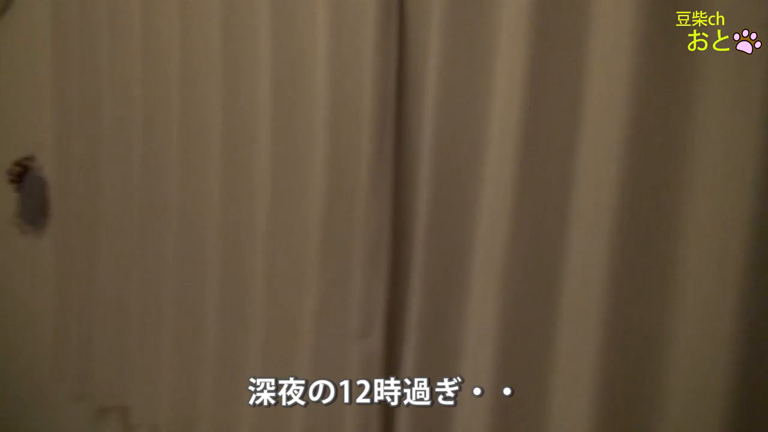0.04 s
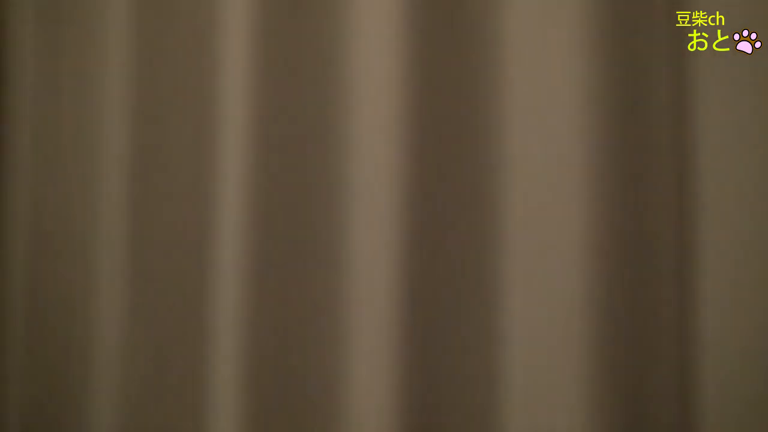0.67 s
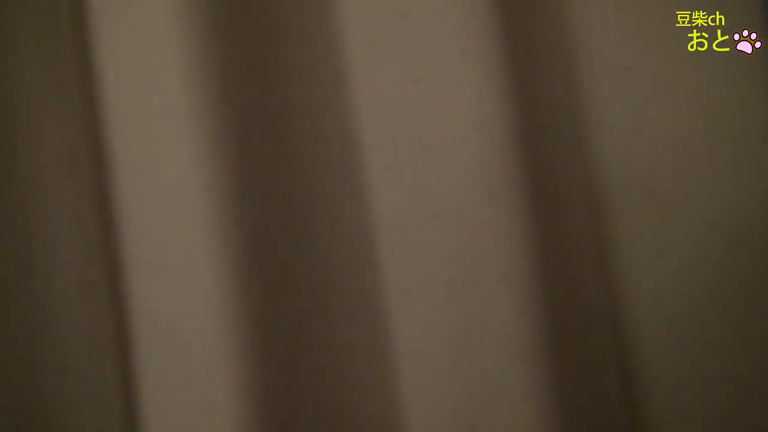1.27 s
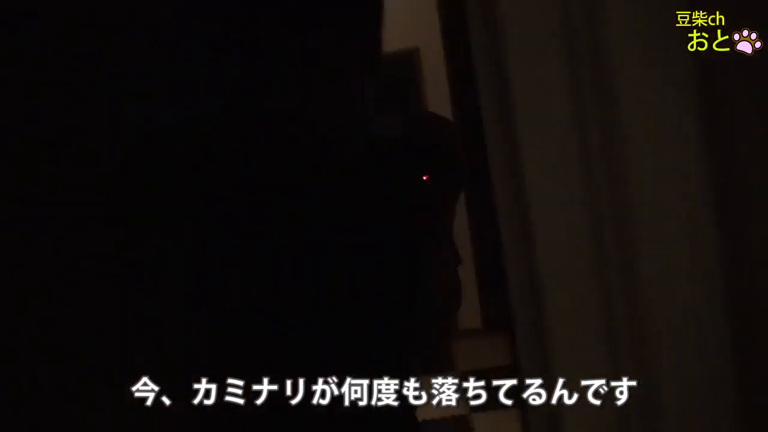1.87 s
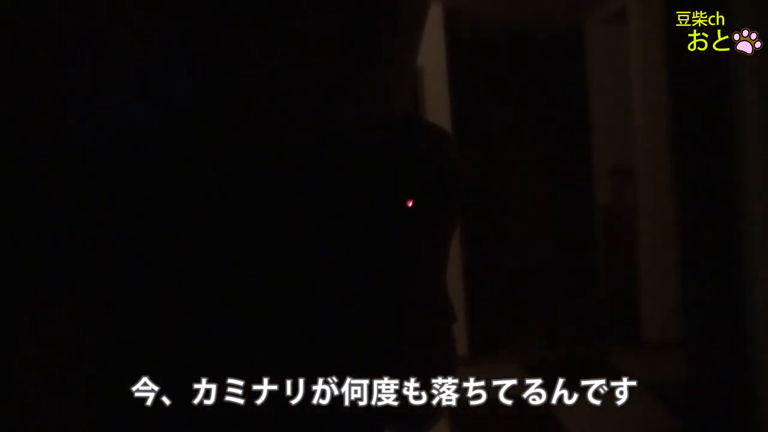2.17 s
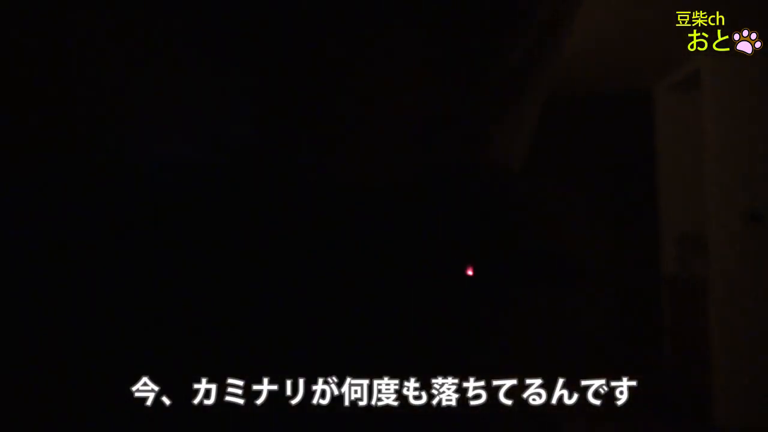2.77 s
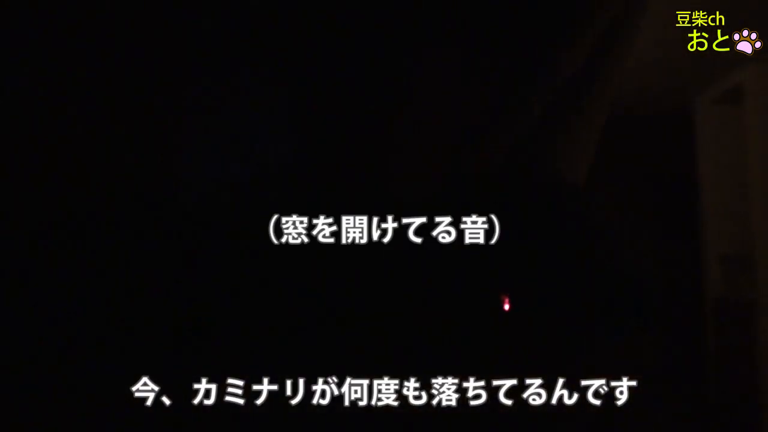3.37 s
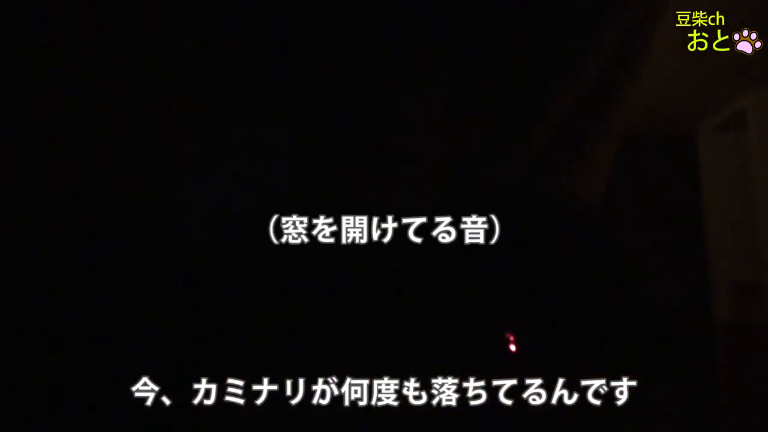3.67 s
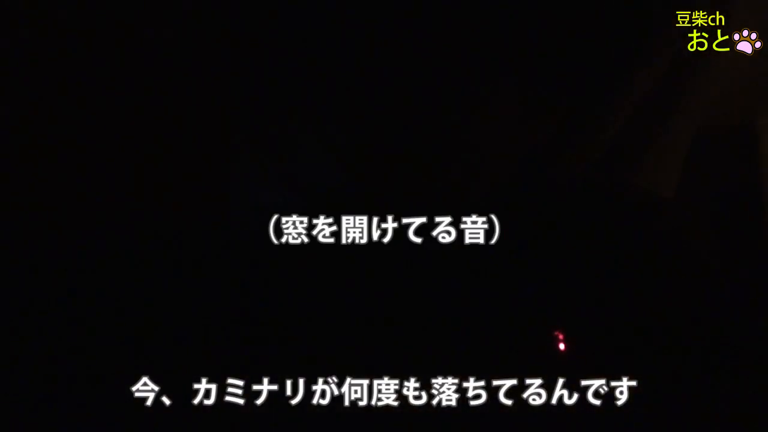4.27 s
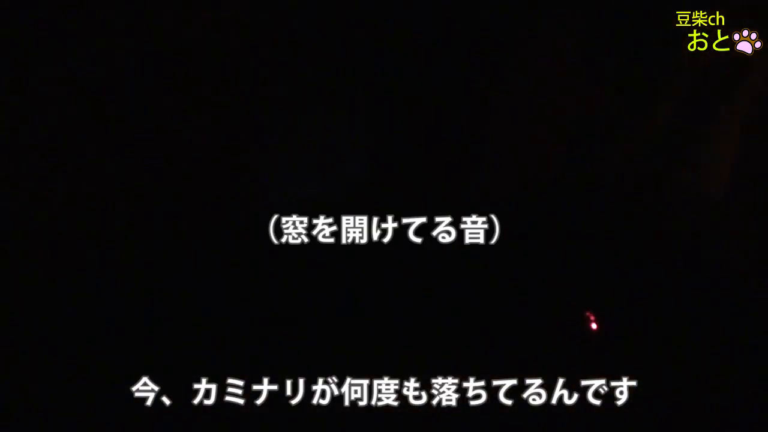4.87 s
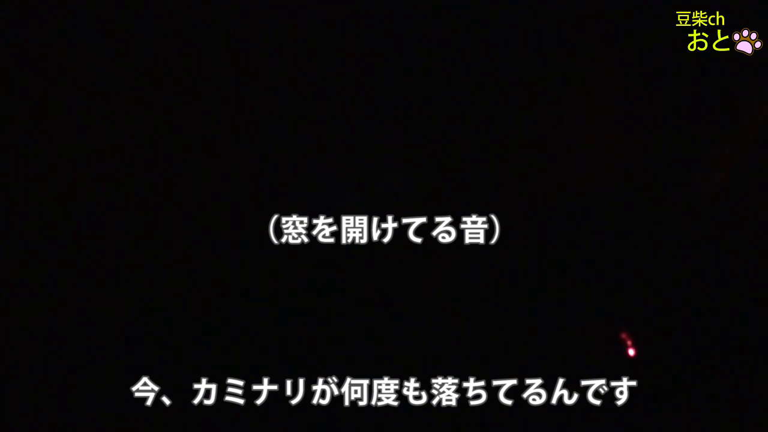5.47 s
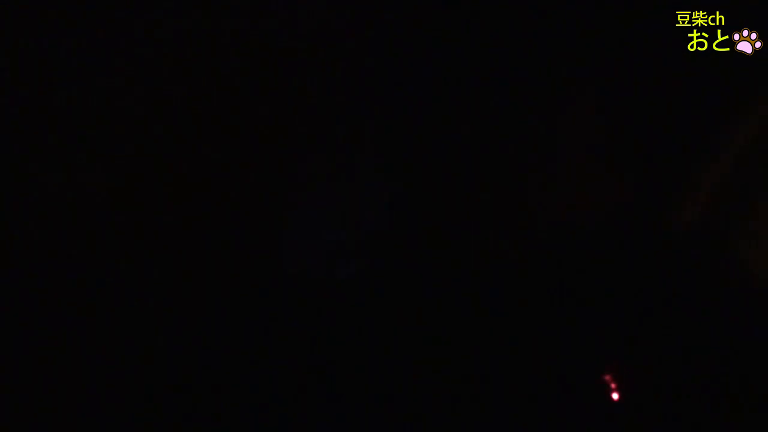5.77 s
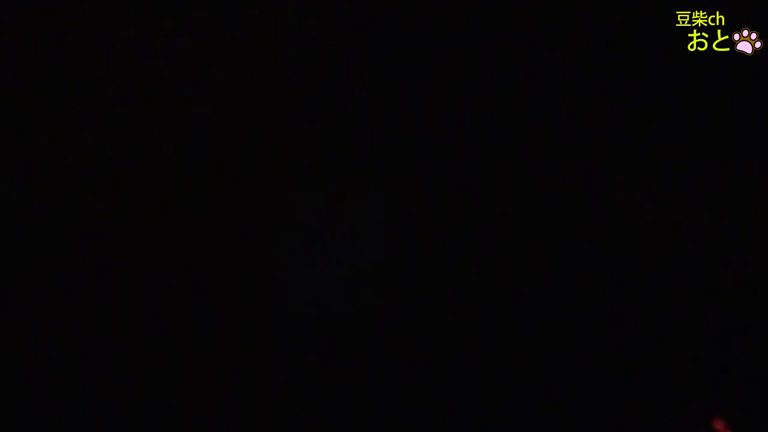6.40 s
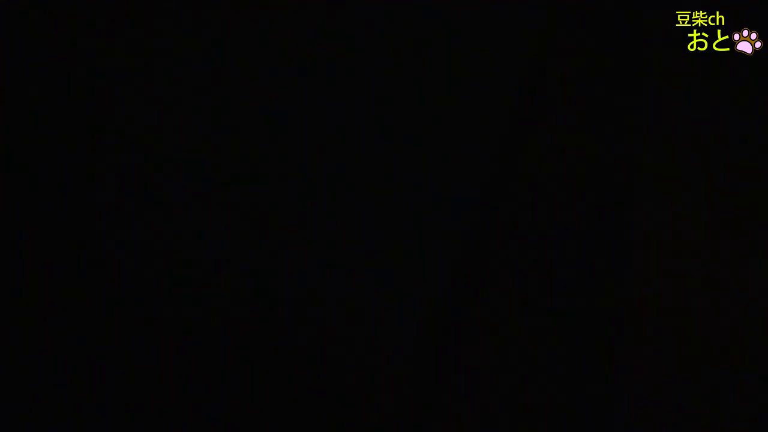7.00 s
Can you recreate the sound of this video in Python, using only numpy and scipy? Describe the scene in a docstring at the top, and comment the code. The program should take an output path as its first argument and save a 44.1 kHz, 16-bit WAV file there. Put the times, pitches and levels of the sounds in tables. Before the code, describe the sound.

Curtains rustle softly, then a sliding metal window is unlatched and opened with sharp clicks, rattles and a short scrape.

```python
"""The latch and sash of a sliding metal window click and rattle as someone opens it at night in a small room.
Each impact excites the modes of the frame and the hollow sash, and jolts make the pane thump. Stick-slip
friction squeaks on the track; the sash scrapes free, its seal pops, and it rolls a little way and settles.
Before that, cloth curtains rustle as the person pushes through. Soft shuffling and steady room noise lie
underneath, and a faint hiss of the night enters through the gap."""
import sys
import numpy as np
from scipy import signal
from scipy.fft import rfft, irfft, next_fast_len
from scipy.io import wavfile
from scipy.ndimage import uniform_filter1d, map_coordinates

SR = 44100
rng = np.random.default_rng(int(sys.argv[2]) if len(sys.argv) > 2 else 0)


def master(y):
    """Save y as 16-bit WAV."""
    cut = np.clip(np.atleast_2d(y).T, -1, 1)
    pcm = np.round(cut * 32767)  # scale
    wavfile.write(sys.argv[1], SR, pcm.astype(np.int16))


N = 314874

# Latch and sash snapping home. Each row: start in seconds, level in dB, knock, bite and fizz in dB relative
# to it, leading ring in Hz, t60 in seconds, lead of the first touch in seconds, touch level in dB.
SNAPS = [(2.753, -22, -11, 0, -11.5, 2380, 0.043, .004, -28.5),
         (3.001, -37, -12.5, -2.5, -13, 1530, 0.046, 0.009, -38.5),
         (3.4553, -22.5, -15.5, -3.5, -15, 1830, .033, 0.0053, -42.5),
         (3.659, -27.5, -13.5, -3, -32, 6030, 0.041, 0.0097, -46),
         (4.056, -26, -10, 6, -13.5, 2950, 0.028, 0.0046, -41),
         (4.2497, -33, -18, -7, -21, 2210, 0.041, 0.005, -46),
         (5.213, -22.5, -26, -1.5, -9.5, 1800, 0.038, 0.0082, -48),
         (5.704, -36.5, -17, -1, -22, 1910, .036, .01, -44.5),
         (5.748, -31, -10, -7.5, -21.5, 1720, 0.038, 0.0076, -43)]
# Taps of loose metal. Each row: start in seconds, level in dB, hardness in dB.
TAPS = [(.008, -49.5, -4.5), (1.981, -42.5, -23), (2.057, -39, -7), (2.357, -50.5, 5), (2.376, -44.5, 0),
        (2.62, -44, 6.5), (2.643, -44, -6), (2.673, -43, -4), (3.13, -45, -4.5), (3.255, -45, -10),
        (3.343, -46.5, 1.5), (3.363, -50, -23), (3.376, -36.5, -9.5), (3.464, -30.5, -4.5),
        (3.489, -38.5, -2.5), (4.19, -51, 0), (4.307, -34, -4), (4.62, -47.5, -5), (4.707, -40.5, -19),
        (4.728, -46, 2.5), (4.96, -52, -4), (5.109, -45.5, -1.5), (5.2315, -34, 4.5), (5.2618, -45.5, 10.5),
        (5.642, -55.5, 2), (5.861, -44.5, -6), (5.9596, -26.5, -11), (6.143, -40.5, -4.5),
        (6.184, -41, -22), (6.21, -44.5, -15), (6.324, -38, -8), (6.353, -52.5, 6.5), (6.37, -53, 7.5),
        (6.39, -37.5, 3), (6.442, -42.5, 3), (6.484, -52, 2), (7.037, -41, -6)]
# Dull knocks of the sash in its frame. Each row: start in seconds, level in dB, leading ring in Hz.
KNOCKS = [(2.355, -48, 403), (3.08, -41, 330), (3.47, -35.5, 300), (4.298, -32.5, 640), (4.311, -35, 385),
          (4.392, -42.5, 536), (4.412, -39.5, 410), (4.445, -40, 510), (5.678, -46.5, 670),
          (6.246, -41, 280)]
# Resonances of the metal. Each row: frequency in Hz, bandwidth in Hz, gain in dB.
FRAME_MODES = [(386, 22, -12), (720, 42, -26), (1160, 190, -13), (1390, 116, -4.5), (1608, 84, -8.5),
               (1780, 105, -4.5), (1927, 140, -6), (2365, 170, -13.5), (2860, 900, -12), (3210, 160, -14.5),
               (3610, 460, -14.5), (4100, 75, -8.5), (4530, 520, -11), (5180, 120, -13), (6230, 120, -7),
               (6600, 180, -12.5), (7020, 150, -2), (7700, 190, -5), (7940, 130, -19), (11040, 660, -11),
               (12900, 300, -13)]
TRACK_MODES = [(6180, 10, -1), (6400, 7.7, 1), (6640, 9, -10)]
# Modes of the hollow sash and the glass. Each row: frequency in Hz, relative level in dB, t60 in seconds.
SASH_MODES = [(241.6, -15, 0.3), (330.4, -4, 0.3), (396.4, -0.5, 0.17), (502, -4.5, 0.25), (533, -23, 0.26),
              (714, -1, 0.095)]
PANE_MODES = [(20.8, -2.5, 0.47), (48.7, 3, 0.25), (58.6, -7, 0.29), (78.4, -8.5, 0.36), (96, -9, 0.41),
              (117, -6.5, 0.29), (163, -9.5, 0.21), (200.5, -3, 0.2), (249.3, -6, 0.26), (289, -12.5, 0.32),
              (396, -22, 0.16), (537, -19, 0.22)]
# Jolts of the pane. Each row: start in seconds, level in dB.
JOLTS = [(3.001, -52), (3.466, -42), (3.663, -34), (4.071, -40), (4.312, -43), (4.459, -48), (4.712, -53),
         (5.746, -39.5), (5.895, -39), (6.25, -43.5)]
# The rubber seal letting go. Each row: start in seconds, pitch in Hz, relative level in dB, t60 in seconds.
POPS = [(5.918, 940, -10, 0.016), (5.9233, 1340, -10, 0.012), (5.9617, 1360, -19, 0.013),
        (5.965, 1010, -22, 0.036), (5.972, 1100, -7, 0.0093), (5.9959, 1184, -3, 0.011)]
# Squeaks of the curtain runners and the track.
# Each row: start and length in seconds, first and last pitch in Hz, level in dB.
SQUEAKS = [(1.537, 0.022, 2155, 2310, -41.5), (3.651, 0.0072, 4900, 5830, -30),
           (3.658, 0.0079, 6080, 6150, -24.5), (3.6584, 0.0096, 6660, 6500, -25.5),
           (4.645, 0.0094, 1480, 1440, -42), (5.765, 0.015, 6160, 6160, -30.5),
           (5.878, 0.014, 5770, 5730, -24), (5.8902, 0.0083, 5100, 5230, -15.5)]
# Strokes of cloth. Each row: start and rise in seconds, rubbing level in dB, hiss in dB relative to it.
STROKES = [(0.026, 0.031, -48.5, -10), (.07, 0.043, -54.5, 0), (.437, 0.027, -55, 0.5),
           (.5, 0.058, -50, -6), (.62, 0.038, -54.5, 1), (1.07, 0.017, -65, 4), (1.19, 0.082, -52, 0),
           (1.533, 0.01, -43, -5), (1.79, 0.053, -57.5, -4), (1.895, 0.14, -50.5, -5.5),
           (2.054, 0.0072, -38.5, -4), (2.153, 0.0073, -49.5, 3), (2.348, 0.0041, -48.5, -5),
           (2.45, 0.058, -50.5, -2), (2.78, 0.047, -54, -6), (2.912, 0.079, -47.5, 0.5),
           (3.098, 0.059, -56.5, -0.5), (4.36, .017, -54.5, -3), (4.44, 0.01, -57, 6.5)]
# Spectra of the impacts, friction and background noises. Each row: frequency in Hz, relative level in dB.
CONTACT_SPECTRUM = [(130, -4.5), (330, -7.5), (650, 2), (2000, -1), (3100, 1.5), (5000, 2.5), (8000, -5),
                    (9500, -9), (12500, -20.5), (16000, -39)]
GRIND_SPECTRUM = [(40, -5), (160, 0.5), (400, 2.5), (1100, 0), (2000, 2.5), (3500, -4.5), (6000, -7.5),
                  (8500, -21), (16000, -39)]
ROLL_SPECTRUM = [(300, 5), (2000, 1), (5500, 2.5), (8200, 4.5), (10000, -1.5), (12500, -6), (16000, -36)]
LATCH_RUB_SPECTRUM = [(300, -10), (900, 0.5), (1600, 1), (3000, -11), (6500, -15), (12000, -36)]
CLOTH_RUB_SPECTRUM = [(200, -12), (600, -6), (1300, -5.5), (2200, 0), (3800, 1), (5500, -9), (9000, -22),
                      (16000, -35)]
CLOTH_HISS_SPECTRUM = [(2000, -42), (4200, -0.5), (5800, 2.5), (8000, -1.5), (9500, -4), (11500, -10),
                       (16000, -35)]
SHUFFLE_SPECTRUM = [(20, -9), (40, -3), (65, 0), (230, 0.5), (500, -6), (1700, -7), (3000, -12),
                    (7000, -16.5), (14000, -40.5)]
NIGHT_SPECTRUM = [(500, 3.5), (2000, 3.5), (6000, 0), (9000, -10), (16000, -31)]
AIR_SPECTRUM = [(12, -56), (20, -18), (156, -4), (189, -14.5), (243, -6.5), (487, -17.5), (608, -14),
                (896, -16), (1030, -13), (1120, -16.5), (1840, -16.5), (15200, -37)]
# Envelopes of the shuffling and the night outside. Each row: time in seconds, relative level in dB.
SHUFFLE_LEVELS = [(0, -59), (.35, -74), (.55, -59.5), (.9, -70), (1.7, -56), (2.0, -55), (2.9, -57.5),
                  (3.6, -50), (3.9, -60.5), (4.3, -49.5), (5.0, -59), (5.4, -61.5), (5.8, -55), (6.25, -53),
                  (6.5, -59.5), (7.1, -65)]
NIGHT_LEVELS = [(5.9, -85), (6.55, -68.5), (6.95, -61.5)]
# Reverberation of the room. Each row: frequency in Hz, t60 in seconds.
ROOM_DECAY = [(100, 0.41), (400, 0.51), (1500, 0.22), (6300, 0.22), (10000, 0.2), (16000, 0.32)]


def impacts(ring_db=8, scatter_db=3.2, lead_q=5, onset_s=0.00054, hum_db=-7):
    """Modal excitation: each contact drives frame and sash with a sharp blow and a brief chatter."""
    size = 8192
    out, t, hz = np.zeros(N), np.arange(size) / SR, np.fft.rfftfreq(size, 1 / SR)
    bands_hz = [(600, 2500), (200, 600), (2500, 8300), (8300, 16000)]  # middle, knock, bite, fizz
    filters = [signal.butter(3, band, "band", fs=SR, output="sos") for band in bands_hz]
    attack = t < .009  # each band's level is set over this span
    taper = np.minimum(1, 2 * (1 - t / t[-1])) ** 2
    modes, contact = frame_modes(hz), amp(along(CONTACT_SPECTRUM, hz))
    contacts = snaps() + [tap(*row) for row in TAPS] + [knock(*row) for row in KNOCKS] + rattles()
    for s, db, knock_db, bite_db, fizz_db, lead_hz, t60, room_db in contacts:
        envelope = (fade(t, t60) + amp(-1) * fade(t, 0.0057)) * (1 - np.exp(-t / onset_s))
        force = rng.standard_normal(size) * envelope
        # each point of contact drives the modes differently
        mode_gains = amp(ring_db + scatter_db * rng.standard_normal((len(modes), 1)))
        body = 1 + np.sum(mode_gains * modes, axis=0)
        struck_part = 1 + resonance(hz, lead_hz, lead_hz / lead_q)
        ring = irfft(rfft(force) * contact * body * struck_part) * taper
        hit = amp(db + knock_db + hum_db) * ringing(SASH_MODES, t)
        for sos, weight_db in zip(filters, (0, knock_db, bite_db, fizz_db)):
            band = signal.sosfilt(sos, ring)
            hit += amp(db + weight_db) * band / np.std(band[attack])
        add(out, s, hit)
        add(out, s, amp(room_db) * signal.fftconvolve(hit, room_tail()))
    return out


def snaps(touch_bite_db=6, touch_hz=5940, touch_room_db=-14.5):
    """Double impact: a light, bright touch precedes the full blow."""
    rows = []
    for s, db, knock_db, bite_db, fizz_db, hz, t60, early, touch_db in SNAPS:
        room_db = -13.5 + 12 * np.log2(t60 / .036)  # longer chatter fills the room more
        rows.append((s - early, touch_db, knock_db, touch_bite_db, fizz_db + 12, touch_hz, t60, touch_room_db))
        rows.append((s, db, knock_db, bite_db, fizz_db, hz, t60, room_db))
    return rows


def tap(s, db, hardness_db, knock_db=-9.5, t60=0.03, room_db=-15):
    """Contact stiffness: the harder a light impact, the brighter and higher it rings."""
    lead_hz = 6000 if hardness_db > 1 else 1660  # hard taps ring the catch, soft ones the frame
    fizz_db = -8.5 + 1.75 * hardness_db
    return s, db, knock_db, hardness_db, fizz_db, lead_hz, t60, room_db


def knock(s, db, lead_hz, knock_db=7.5, bite_db=-6.5, fizz_db=-21, t60=.042, room_db=-16):
    """Soft, heavy impact: the energy lies mostly in the lowest band."""
    return s, db - knock_db, knock_db, bite_db, fizz_db, lead_hz, t60, room_db


def rattles(count=8, span_s=(3.3, 6.35), db=-53, hardness_db=-6, spread_db=2):
    """Intermittent contact: loose metal taps at random while the sash is handled."""
    times = rng.uniform(*span_s, count)
    scatter = spread_db * rng.standard_normal((count, 2))
    return [tap(s, db + louder, hardness_db + harder) for s, (louder, harder) in zip(times, scatter)]


def frame_modes(hz):
    """Resonance: the frame responds as a set of damped oscillators, one row a mode."""
    centre, width, db = np.transpose(FRAME_MODES)[:, :, None]
    return amp(db) * resonance(hz, centre, width)


def pane(even_jolt_db=-41.5):
    """Free vibration: the heavy glass booms after each jolt, deeper after the hard ones."""
    out, t = np.zeros(N), np.arange(SR // 2) / SR
    for s, db in JOLTS:
        db_per_octave = 0.42 * (even_jolt_db - db)
        modes = [(hz, level + db_per_octave * np.log2(max(hz / 60, 1)), t60)
                 for hz, level, t60 in PANE_MODES]
        add(out, s, amp(db) * ringing(modes, t))
    return out


def slide(break_s=5.879, roll_s=5.985, crossover_hz=5000):
    """Sliding, then rolling friction: the sash grinds loose and rolls with a gritty crackle."""
    scrape_level = amp(-27) * swell(break_s, attack=0.014, length=0.08, t60=0.066)
    grit_level = amp(-35.5) * swell(break_s, attack=0.014, length=0.052, t60=0.066)
    rumble_level = amp(-43.5) * swell(roll_s, attack=0.0081, length=0.0081, t60=0.9)
    roll_level = amp(-47.5) * swell(roll_s, attack=0.0081, length=0.18, t60=0.018)
    grind = coloured(grains(3500, smooth=0.8), GRIND_SPECTRUM) * amp(0.5 * wobble(140))
    rollers = coloured(grains(1100, smooth=0.6), ROLL_SPECTRUM)
    through_frame = unit(filtered(rollers, lambda hz: 1 + frame_modes(hz).sum(axis=0)))
    # the rollers catch unevenly, in the low crunch and the fine grit apart
    crunch = filtered(through_frame, lambda hz: 1 / (1 + (hz / crossover_hz) ** 2))
    grit = through_frame - crunch
    roll = crunch * amp(2.1 * wobble(99)) + grit * amp(2.7 * wobble(170))
    return (scrape_level + rumble_level) * grind + (grit_level + roll_level) * roll


def seal_pops(gain_db=-2, onset_s=0.0006):
    """Release of adhesion: the seal comes unstuck in hollow, heavily damped tones."""
    out, t = np.zeros(N), np.arange(SR // 10) / SR
    for s, hz, db, t60 in POPS:
        tone = np.sin(2 * np.pi * hz * t) + amp(-40) * rng.standard_normal(len(t))
        add(out, s, amp(db + gain_db) * tone * fade(t, t60) * (1 - np.exp(-t / onset_s)))
    return out


def squeaks(waver_depth=.016):
    """Stick-slip oscillation: metal sings for milliseconds at a shrill, unsteady pitch."""
    out = np.zeros(N)
    for s, length, start_hz, end_hz, db in SQUEAKS:
        n = int(length * SR)
        waver = unit(uniform_filter1d(rng.standard_normal(SR // 10), size=30))[:n]
        pitch_hz = np.linspace(start_hz, end_hz, n) * (1 + waver_depth * waver)
        phase = 2 * np.pi * np.cumsum(pitch_hz) / SR
        tone = np.sin(phase) + amp(-33) * np.sin(2 * phase)
        add(out, s, amp(db) * signal.windows.tukey(n, .5) * tone)
    return out


def track_ring(x):
    """Sympathetic resonance: the track's lightly damped modes ring on after the drive x."""
    return filtered(x, lambda hz: sum(amp(db) * resonance(hz, f, width) for f, width, db in TRACK_MODES))


def latch_rub(start_s=5.135, db=-45):
    """Dry friction: a hand rubs dully over the latch, easing off as it comes away."""
    level = amp(db) * swell(start_s, attack=0.0032, length=0.0032, t60=.45)
    return level * coloured(grains(3000, smooth=.9), LATCH_RUB_SPECTRUM)


def curtain():
    """Friction of cloth on cloth: the strokes are incoherent noises, so their powers add."""
    t = np.arange(SR) / SR
    drag = amp(-61.5) * swell(1.69, attack=.2, length=1.3, t60=.6)  # over the person's shoulder
    rub_power, hiss_power = drag ** 2, (amp(-2) * drag) ** 2
    for s, rise, db, hiss_db in STROKES:
        settle = fade(np.maximum(t - rise, 0), t60=0.34 + 1.96 * rise)  # slow strokes settle slowly
        stroke = amp(db) * np.minimum(t / rise, 1) ** 0.75 * settle
        add(rub_power, s, stroke ** 2)
        add(hiss_power, s, (amp(hiss_db) * stroke) ** 2)
    rub = coloured(grains(9000, smooth=1.63), CLOTH_RUB_SPECTRUM) * np.sqrt(rub_power)
    hiss = coloured(grains(9000, smooth=0.8), CLOTH_HISS_SPECTRUM) * np.sqrt(hiss_power)
    return (rub + hiss) * amp(0.17 * wobble(90))


def room_tail(build_s=0.0026):
    """Diffuse reverberation: an impulse response in which each frequency decays at its own rate."""
    hz, t, spectra = signal.stft(rng.standard_normal(SR // 3), SR, nperseg=256)
    tail = signal.istft(spectra * fade(t, along(ROOM_DECAY, hz)[:, None]), SR, nperseg=256)[1]
    tail *= 1 - np.exp(-np.arange(len(tail)) / SR / build_s)
    return tail / np.linalg.norm(tail)


def background(air_db=-59, shuffle_gain_db=-2, waver_db=2.2):
    """Broadband noise: the steady room, the night let in by the gap, and a person shuffling."""
    air = amp(air_db) * coloured(rng.standard_normal(N), AIR_SPECTRUM)
    night = amp(curve(NIGHT_LEVELS)) * coloured(rng.standard_normal(N), NIGHT_SPECTRUM)
    shuffle_level = amp(curve(SHUFFLE_LEVELS) + shuffle_gain_db + waver_db * wobble(25))
    shuffle = shuffle_level * coloured(rng.standard_normal(N), SHUFFLE_SPECTRUM)
    return air + night + shuffle


def resonance(hz, centre, width):
    """Frequency response of a damped oscillator, 1 at its centre."""
    return 1j * hz * width / (centre * centre - hz * hz + 1j * hz * width)


def ringing(modes, t, onset_s=0.0042):
    """Modal superposition: decaying sines with new strengths and phases for each blow."""
    tones = sum(amp(db + rng.normal(0, 2.9)) * fade(t, t60) * np.sin(2 * np.pi * (hz * t + rng.random()))
                for hz, db, t60 in modes)
    return tones * (1 - np.exp(-t / onset_s))


def grains(rate, smooth):
    """Shot noise: tiny random slips, rate a second, over a share of even noise."""
    slips = (rng.random(N) < rate / SR) * rng.standard_normal(N)
    return unit(unit(slips) + smooth * rng.standard_normal(N))


def wobble(rate):
    """Random modulation: a smooth curve with rate knots a second."""
    return map_coordinates(rng.standard_normal(int(N * rate / SR) + 4), [np.arange(N) * rate / SR])


def swell(start, attack, length, t60):
    """Envelope, in seconds: a linear rise, a hold until start + length, then exponential decay."""
    t = np.arange(N) / SR - start
    return np.clip(t / attack, 0, 1) * fade(np.maximum(t - length, 0), t60)


def fade(t, t60):
    """Exponential decay by 60 dB in t60 seconds."""
    return np.exp(-np.log(1000) * t / t60)


def filtered(x, response):
    """Linear filtering: the spectrum of x times a frequency response."""
    size = next_fast_len(len(x) + SR // 8)
    return irfft(rfft(x, size) * response(np.fft.rfftfreq(size, 1 / SR)), size)[:len(x)]


def coloured(x, spectrum):
    """Spectral shaping of x, at rms 1."""
    return unit(filtered(x, lambda hz: amp(along(spectrum, hz))))


def along(points, hz):
    """Interpolation of (Hz, value) points on a log axis."""
    freqs, values = np.transpose(points)
    return np.interp(np.log(hz + 1), np.log(freqs + 1), values)


def curve(points):
    """Interpolation of (seconds, value) points at every sample."""
    return np.interp(np.arange(N) / SR, *np.transpose(points))


def amp(db):
    """Decibels to amplitude ratio."""
    return 10 ** (np.asarray(db) / 20)


def unit(x):
    """Normalisation to rms 1."""
    return x / np.sqrt(np.mean(x ** 2) + 1e-20)


def add(out, s, x):
    """Superposition of x on out from s seconds."""
    part = out[round(s * SR):][:len(x)]
    part += x[:len(part)]


def scene():
    """Superposition: the close window with a little reverberation, the curtain and the background."""
    hits, sash, shrill = impacts(), slide() + seal_pops(), squeaks()
    track = track_ring(shrill + amp(-6) * hits)
    direct = hits + latch_rub() + pane() + sash + shrill + track
    reverberation = signal.oaconvolve(amp(-21) * sash + amp(-14) * shrill, room_tail())[:N]
    return (direct + reverberation + curtain() + background())[None]


def record(dry, top_hz=16000):
    """Band limiting: an ideal low-pass filter removes the highest treble."""
    return filtered(dry[0], lambda hz: hz < top_hz)[None]


dry = scene()
out = record(dry)
master(out)
```